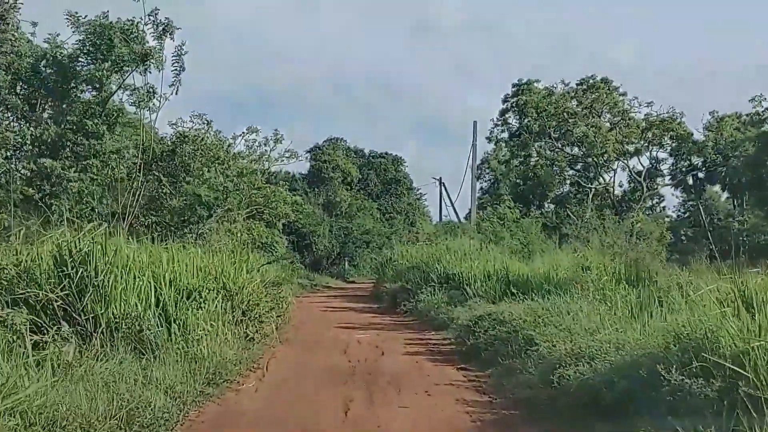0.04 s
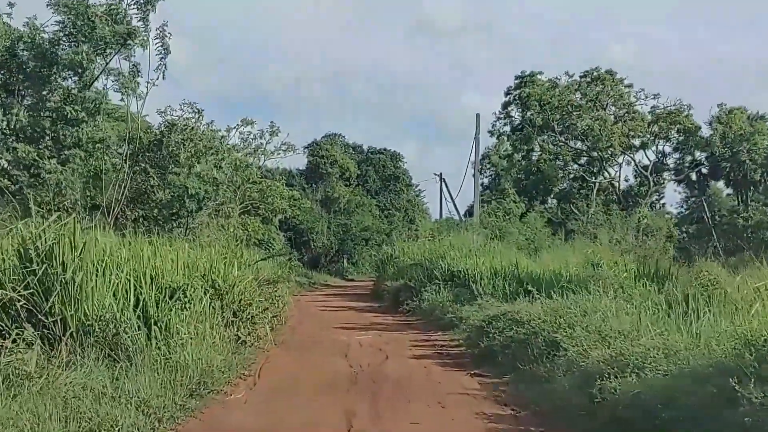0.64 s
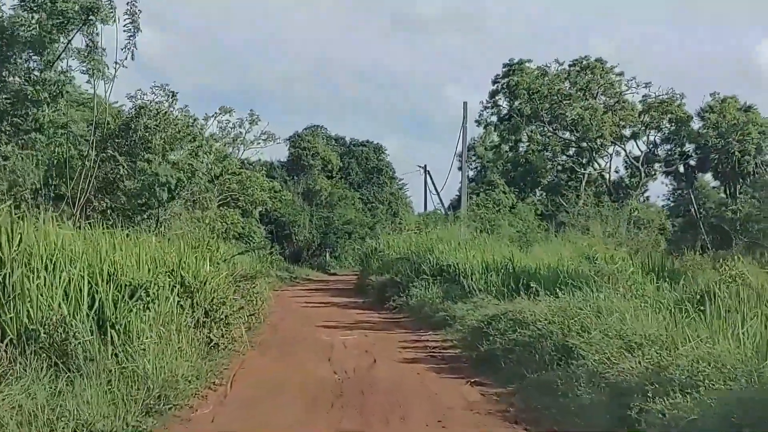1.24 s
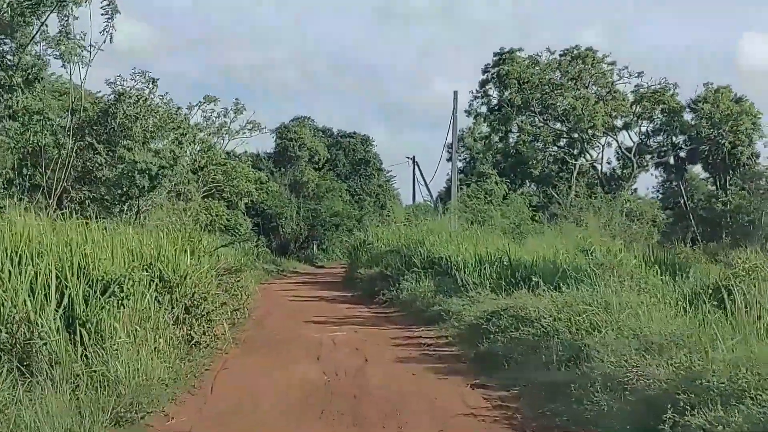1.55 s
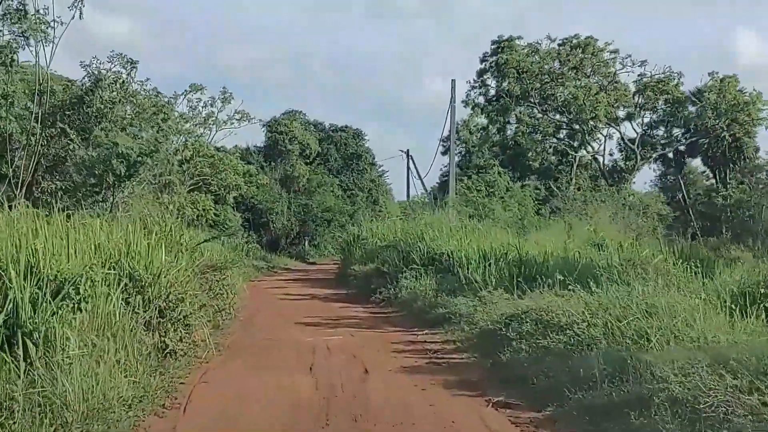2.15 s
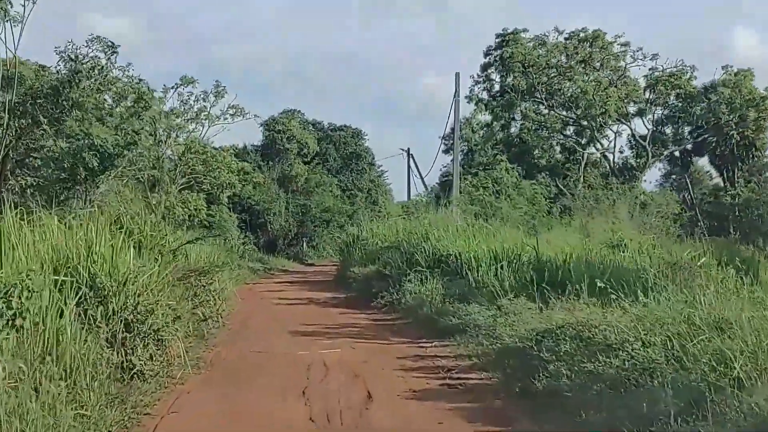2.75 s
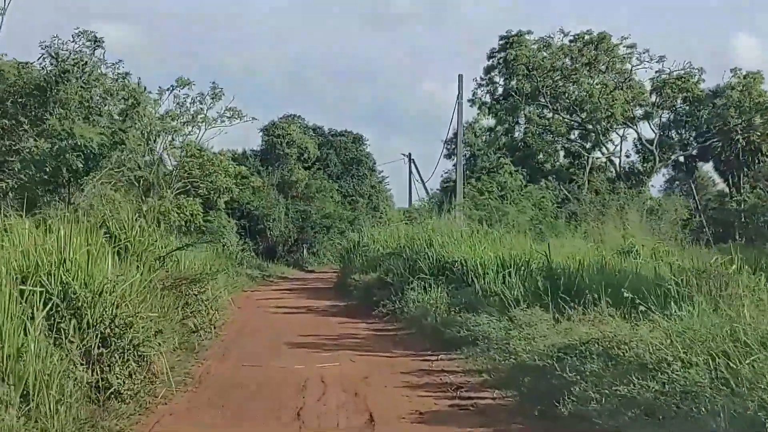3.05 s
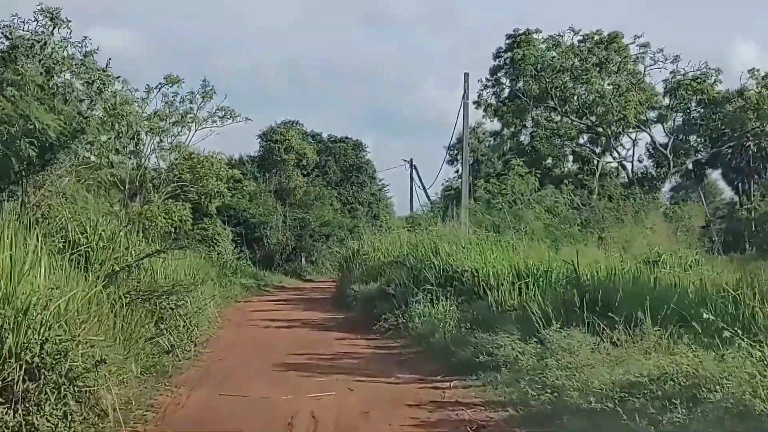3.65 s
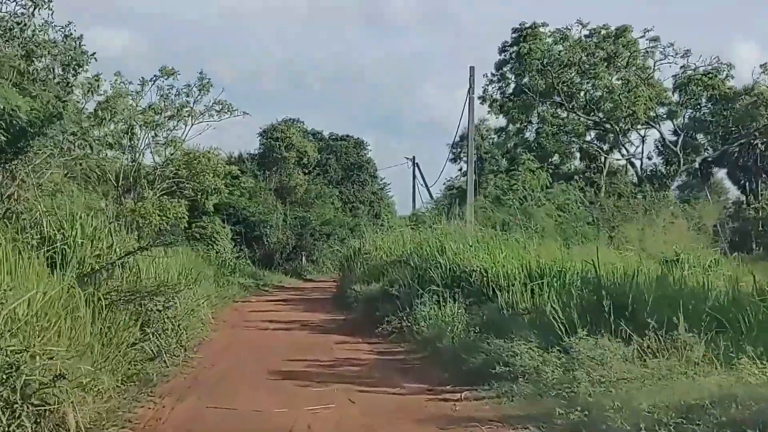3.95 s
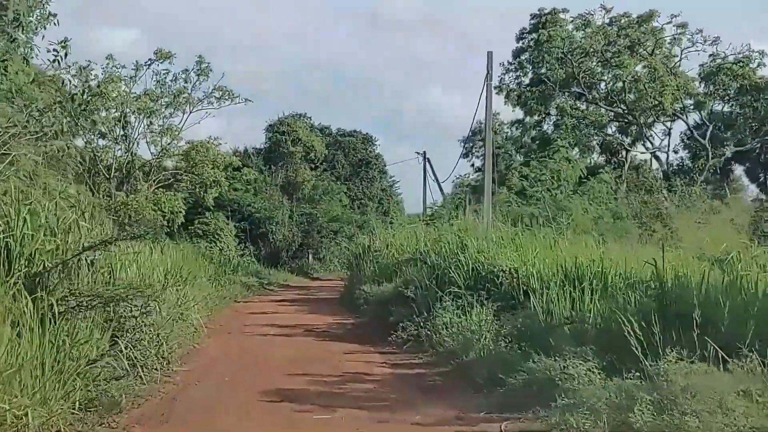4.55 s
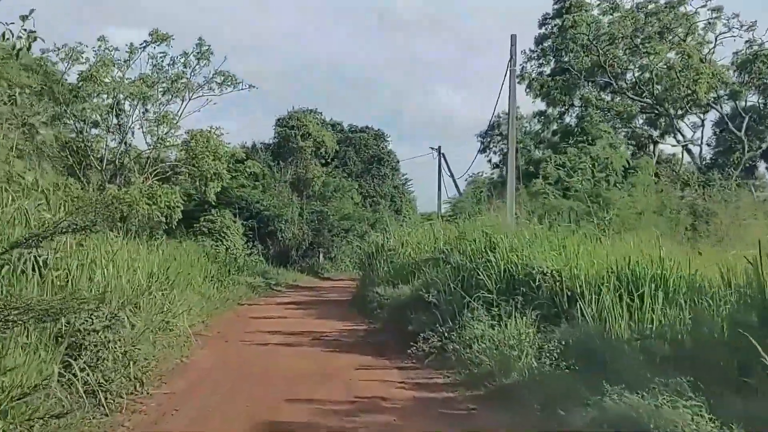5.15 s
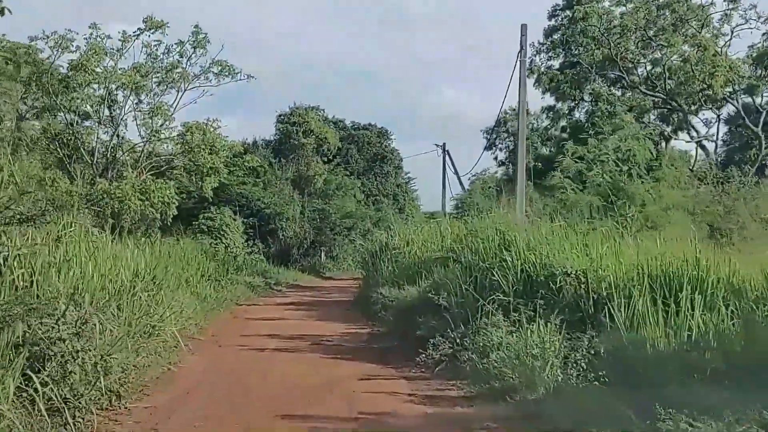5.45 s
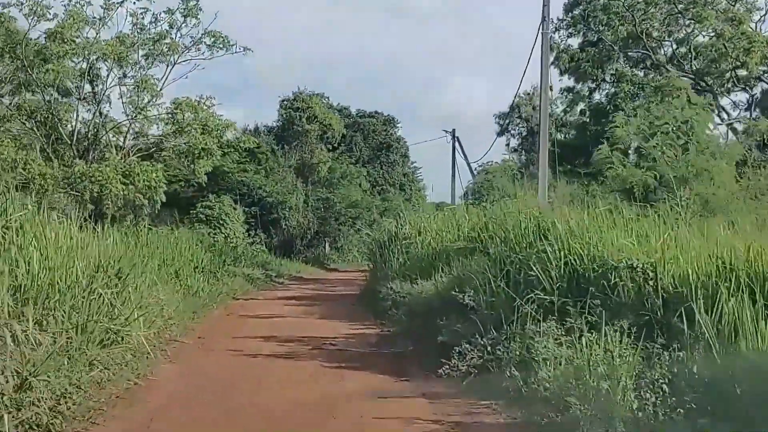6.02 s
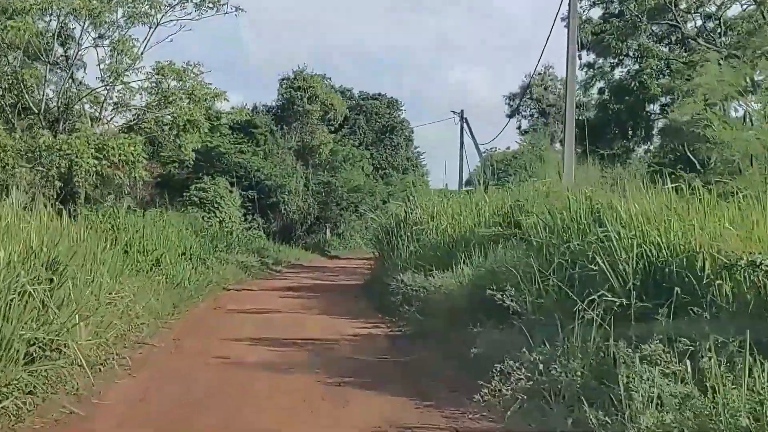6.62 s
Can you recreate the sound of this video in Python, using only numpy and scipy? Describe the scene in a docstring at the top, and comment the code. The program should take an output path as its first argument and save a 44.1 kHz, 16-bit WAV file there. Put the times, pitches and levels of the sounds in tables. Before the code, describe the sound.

A car's low rumble and engine hum, heard from inside, as bumps thud through the suspension and loose parts rattle.

```python
"""A deep, jolting rumble over an engine drone, inside a car creeping along a rutted dirt road.
The ruts pump the cabin air, shake the wheels and ring the body panels; the tyres crunch on grit.
Bumps knock the suspension and trim, loose parts click, squeak and sizzle, light things rustle.
One short low groan sounds near the end."""
import sys
import numpy as np
from scipy import signal
from scipy.fft import rfft, irfft
from scipy.io import wavfile
from scipy.ndimage import uniform_filter1d

SR = 44100
rng = np.random.default_rng(int(sys.argv[2]) if len(sys.argv) > 2 else 0)


def waveform_to_disk(signal):
    """Save audio, clipped to [-1, 1], as 16-bit WAV at the path in sys.argv[1]."""
    frames = np.transpose(np.atleast_2d(signal))
    scaled = np.clip(frames, -1, 1) * 32767
    samples = np.round(scaled).astype(np.int16)
    wavfile.write(sys.argv[1], SR, samples)


N = 303408
TIME = np.arange(N) / SR
FREQ = np.fft.rfftfreq(N, 1 / SR)


def undb(db):
    """Decibels to gain."""
    return 10 ** (np.asarray(db) / 20)


def curves(table):
    """Each value column of a table, interpolated over time."""
    times_s, *columns = np.transpose(table)
    return [np.interp(TIME, times_s, column) for column in columns]


def unit(x):
    """Scale to rms 1."""
    return x / np.sqrt(np.mean(x ** 2))


def walk(rate_hz):
    """Random drift, rms 1: held levels, smoothed twice."""
    k = max(int(SR / rate_hz), 1)
    held = np.repeat(rng.standard_normal(N // k + 1), k)
    return unit(uniform_filter1d(uniform_filter1d(held, k), k)[:N])


def resonate(x, hz, width_hz):
    """One resonance, gain 1 at its centre."""
    return signal.lfilter(*signal.iirpeak(min(hz, .45 * SR), hz / width_hz, fs=SR), x)


def levelled(x, span_s):
    """Even out a vibration's strength over spans longer than span_s."""
    k = max(int(span_s * SR), 1)
    power = uniform_filter1d(uniform_filter1d(np.mean(x, axis=0) ** 2, k), k)
    return x / np.sqrt(power + 1e-6)


def hit(start_s, hold_s, t60_s, rise_s):
    """Slice and envelope of an impact: rise, hold, exponential decay."""
    first = max(int(start_s * SR), 0)
    span = slice(first, min(first + SR // 3, N))
    age = TIME[span] - TIME[first]
    decay = np.exp(-np.log(1000) * np.maximum(age - hold_s, 0) / t60_s)
    return span, (1 - np.exp(-age / rise_s)) * decay


def bump(age, rise_s, fall_s):
    """Lopsided Gaussian, peak at age 0."""
    return np.exp(-(age / np.where(age < 0, rise_s, fall_s)) ** 2)


# Stereo width in the cabin: (frequency [Hz], side minus mid [dB])
CABIN_WIDTH = [(30, -49), (60, -38), (110, -18), (200, -12), (380, -6.5), (530, -9), (700, 2.5),
               (1000, -1.5), (2000, -0.5), (5000, 0.5), (8000, -1)]

def cabin_noise(spectrum, peaks=(), drive=1, ripple_db=3.0):
    """Noise from all sides, rms 1, shaped by (Hz, dB) points: near mono in the bass, wide in the treble."""
    def along(points):
        hz, db = np.transpose(points)
        return np.interp(np.log(FREQ + 1e-9), np.log(hz), db)
    db = along(spectrum)
    for centre_hz, width_hz, lift_db in peaks:
        db = db + lift_db / (1 + (2 * (FREQ - centre_hz) / width_hz) ** 2)
    # reflections ripple the spectrum above the bass
    ripple_hz = np.arange(0, SR, 55)
    ripple = np.interp(FREQ, ripple_hz, rng.standard_normal(len(ripple_hz)))
    db = db + ripple_db * ripple * np.minimum(FREQ / 1500, 1)
    in_band = (FREQ > spectrum[0][0]) & (FREQ < spectrum[-1][0])
    mid, side = rfft(rng.standard_normal((2, N)) * drive) * undb(db) * in_band
    side = side * undb(along(CABIN_WIDTH))
    return unit(irfft(np.array([mid + side, mid - side]), N))


# Engine speed: (time [s], firing rate [Hz])
FIRING_RATE = [(0, 31.5), (1.8, 32), (2.7, 33), (3.6, 35), (4.7, 34), (5.8, 35), (6.88, 36)]
# Drone partials: (multiple of the firing rate, level [dB])
ENGINE_ORDERS = [(1, -27), (2, -25), (4, -34.5)]

def engine():
    """A slow engine drones and throbs with its load; a faint steady hum runs beside it."""
    throb_db, hum_hz, hum_db = 2.5, 164.4, -34.5
    firings = np.cumsum(curves(FIRING_RATE)[0] * (1 + 0.0059 * walk(6))) / SR
    drone = np.zeros(N)
    for order, db in ENGINE_ORDERS:
        gain = undb(db + throb_db * walk(7))
        drone += gain * np.sin(2 * np.pi * (order * firings + rng.random()))
    hum = undb(hum_db + 1.8 * walk(4.02)) * np.sin(2 * np.pi * hum_hz * TIME)
    return np.sqrt(2) * (drone + hum)


# Crunch, sizzle and dust hiss spectra: (frequency [Hz], relative density [dB])
CRUNCH_SPECTRUM = [(350, -3), (650, -3.5), (820, 2), (1000, 0.5), (1200, -5), (1500, -6.5), (1900, -9),
                   (2500, -16), (3200, -19), (4300, -23.5), (6000, -29.5), (9000, -40)]
SIZZLE_SPECTRUM = [(3500, -15), (6200, -12.5), (6700, 1.5), (7400, 1), (8050, -3), (8400, -14),
                   (11000, -33)]
DUST_SPECTRUM = [(2500, -4), (4500, -5), (8000, 0), (9000, -10.5), (10300, -3.5), (12500, -6.5),
                 (13400, -3.5), (15800, -5)]
# Tyre crunch: (time [s], base level [dB])
CRUNCH_COURSE = [(0, -36.5), (.35, -35.5), (.7, -38.5), (1.35, -38.5), (1.7, -38), (3.4, -37.5),
                 (4.5, -37.5), (5.6, -37.5), (6.88, -36)]
# Loose grit under the car: (time [s], relative treble level [dB])
GRIT_COURSE = [(0.0, -54), (0.57, -49.5), (0.82, -55.5), (1.44, -60.5), (1.63, -56.5), (2.14, -61.5),
               (2.47, -55), (2.74, -62), (3.05, -61), (4.06, -56.5), (4.31, -53), (4.54, -53.5),
               (5.14, -58.5), (5.65, -55.5), (6.07, -49.5), (6.88, -51.5)]
# Sizzle swells: (start [s], length [s], level [dB])
SIZZLE_SWELLS = [(0.368, 0.3, -43), (1.64, 0.26, -52.5), (3.02, 0.37, -49), (5.82, 0.59, -49)]

def tyres_on_grit(panel_gain):
    """Tyres crush countless grains, louder as the panels shake; a narrow sizzle and dust hiss lie above."""
    grit_db, shake_db = curves(GRIT_COURSE)[0], 20 * np.log10(panel_gain)
    grit_db, shake_db = grit_db - grit_db.mean(), shake_db - shake_db.mean()
    crunch = cabin_noise(CRUNCH_SPECTRUM, drive=undb(1.2 * walk(600)), ripple_db=2.3)
    crunch *= undb(curves(CRUNCH_COURSE)[0] + 0.19 * shake_db + 0.77 * walk(24.99))
    sizzle_db, dust_db = -62 + 0.8 * grit_db, -52.5 + 0.64 * grit_db
    sizzle_power = undb(sizzle_db) ** 2
    for start_s, length_s, db in SIZZLE_SWELLS:
        swell = np.sin(np.pi * np.clip((TIME - start_s) / length_s, 0, 1))
        sizzle_power += (undb(db) * swell) ** 2
    sizzle = cabin_noise(SIZZLE_SPECTRUM, ripple_db=4.0) * np.sqrt(sizzle_power) * undb(2.6 * walk(90))
    dust = cabin_noise(DUST_SPECTRUM, ripple_db=3.5) * undb(dust_db + walk(90) + 0.9 * walk(12))
    return crunch + sizzle + dust


# Scrapes and rustles: (start [s], length [s], centre [Hz], width / centre, relative level [dB])
RUSTLE_SWELLS = [(0.102, 0.14, 1650, 0.4, -39.5), (.14, .12, 10000, 1, -50.5),
                 (0.25, 0.085, 1650, 0.37, -38), (0.252, 0.075, 3670, 0.44, -49),
                 (.36, .26, 13000, .7, -54), (1.387, .04, 13500, 1, -43), (1.43, 0.35, 1200, .45, -42),
                 (2.285, 0.16, 13000, 0.45, -50), (2.498, .07, 13000, .5, -49),
                 (2.67, 0.085, 12000, 1, -53), (4.112, 0.12, 13000, 0.82, -38.5),
                 (4.125, 0.17, 7400, 0.62, -48), (4.35, 0.057, 12000, 1, -46),
                 (4.49, 0.064, 1800, 0.68, -46), (5.31, 0.089, 1800, .9, -46),
                 (5.99, 0.046, 13500, .6, -50), (6.22, 0.11, 14000, 0.4, -51)]

def rustles():
    """Grit scrapes and light things brush past each other in swells of uneven hiss."""
    out = np.zeros((2, N))
    friction = rng.standard_normal((2, N)) * undb(2.8 * walk(130))
    for start_s, length_s, hz, width_ratio, db in RUSTLE_SWELLS:
        span = slice(int(start_s * SR), int((start_s + length_s) * SR))
        width_hz = min(hz * width_ratio, .4 * SR)
        hiss = resonate(resonate(friction[:, span], hz, width_hz), hz, width_hz)
        swell = np.sin(np.linspace(0, np.pi, hiss.shape[1]))
        out[:, span] += undb(db + 2.0) * swell * unit(hiss)
    return out


# Pings and squeaks: (start [s], pitch [Hz], level [dB], t60 [s])
SQUEAK_NOTES = [(1.617, 6530, -29.5, 0.025), (1.665, 2950, -35, 0.031), (3.201, 3040, -27.5, 0.045),
                (3.202, 4300, -44, .03), (3.221, 3110, -40, 0.079)]

def squeaks():
    """A small part slips or is flicked and rings on one slightly rough note."""
    out = np.zeros((2, N))
    waver = 1 + .012 * np.array([walk(900), walk(900)])
    for start_s, hz, db, t60_s in SQUEAK_NOTES:
        span, envelope = hit(start_s, hold_s=0.0038, t60_s=t60_s, rise_s=0.0013)
        phase = 2 * np.pi * np.cumsum(hz * waver[:, span], axis=1) / SR
        out[:, span] += undb(db) * envelope * np.sin(phase)
    return out


def groan():
    """A short hollow tone swells, sinks in pitch and fades."""
    start_s, length_s, level_db = 5.89, 0.124, -15.5
    start_hz, sag_hz_per_s = 190, 236
    age = np.clip(TIME - start_s, 0, length_s)
    phase = 2 * np.pi * np.cumsum(start_hz - sag_hz_per_s * age) / SR
    swell = np.sqrt(2 * np.abs(np.sin(np.pi * age / length_s)))
    return undb(level_db) * swell * (np.sin(phase) + undb(-18.5) * np.sin(2 * phase))


# Bright tick and dull clack spectra: (frequency [Hz], relative density [dB])
TICK_SPECTRUM = [(3000, -22), (5500, -7), (6500, -4), (7400, -0.5), (8500, -8), (10500, -7.5), (12000, -8),
                 (13500, -1), (16000, -7.5)]
CLACK_SPECTRUM = [(800, 9), (1800, 3.5), (3200, 6), (5000, 0), (6500, 2), (10000, -16)]
# Modes of loose metal bits: (frequency [Hz], relative level [dB], t60 [s])
METAL_MODES = [(5030, -7, .08), (5900, -14, .08), (6730, -5.5, 0.081), (7030, -4.5, .09), (7160, -5, 0.076),
               (7380, -2, .08), (7800, -5, .08), (8023, -5, .09), (8800, -11, .07), (11600, -4.5, .08),
               (12470, -11, .16), (13355, 0, .09), (13960, -8, .09), (14420, -7, .13)]
# Contacts: (start [s], tick gain [dB], clack gain [dB], rise [s], favoured ring [Hz], ring L - R [dB])
CLICK_HITS = [(0.053, -52, -38, 0.0025, 5100, 0), (0.328, -31, -33.5, .002, 6700, 2),
              (0.41, -32, -38, 0.00036, 7100, -4), (0.501, -29.5, -35, .0004, 6900, -4),
              (0.743, -22.5, -40, 0.00089, 11650, -1), (1.13, -39, -39.5, .003, 8020, 0),
              (1.161, -33, -36.5, .004, 6900, 2), (1.2, -34, -34, .003, 5800, 0),
              (1.369, -36, -46, .002, 14400, 0), (1.414, -31, -44, .002, 13350, -3),
              (1.419, -28, -56, .0005, 13350, -3), (1.618, -39, -56, .001, 6900, -2),
              (1.661, -54, -34.5, .002, 6700, -3), (2.103, -29, -33.5, .001, 6940, 0),
              (2.229, -40, -52, .003, 6900, 0), (2.292, -36.5, -46, .001, 14400, -4),
              (2.353, -30.5, -37, .0005, 14400, 3), (2.445, -51, -41, .003, 7070, -4),
              (2.52, -35, -42, .003, 6700, 0), (2.594, -35, -40, .004, 6800, 0),
              (2.744, -40, -52, .001, 6700, 0), (2.924, -41, -42, .002, 7100, 2),
              (2.9606, -17, -36, .0003, 7350, -8), (3.016, -43.5, -62, .0005, 8020, -2),
              (3.252, -43, -47, .002, 7400, 1), (3.508, -21, -32.5, 0.00075, 5065, -1),
              (3.572, -31, -37, .005, 5800, -11), (3.853, -48, -41.5, .003, 5800, -1),
              (3.965, -43, -36.5, .004, 5060, 2), (4.369, -32, -55, .001, 6660, 0),
              (4.381, -24.5, -50, .0015, 13900, 0), (4.768, -34, -46, .003, 7040, 0),
              (4.814, -39, -43, .002, 7400, 0), (4.9225, -34.5, -44, .0005, 11650, 1),
              (5.7918, -18.5, -39, .0008, 8020, -7), (5.801, -22, -48, .0008, 7095, -13),
              (5.9875, -29.5, -48, .001, 6750, -4), (6.077, -26, -36.5, .005, 7700, -2),
              (6.364, -35, -40, 0.0046, 6740, 7), (6.41, -37, -42, .004, 5070, -2),
              (6.486, -35, -42, 0.0036, 14400, -3), (6.528, -35, -47, 0.0035, 5800, 1),
              (6.627, -32, -33.5, .004, 5100, -1), (6.653, -38, -35.5, .004, 6860, 0)]

def clicks():
    """Loose parts snap and chatter: a bright tick with a thin metal ring, and a duller clack."""
    chatter_db, crack_db, ring_db = -9, -1, -15.5
    favour_db, favour_width_hz, scatter_db = 9.5, 330, 2
    hard_rise_s, crack_decay_s, snap_decay_s = .0007, .0014, .0024
    out = np.zeros((2, N))
    tick_noise = cabin_noise(TICK_SPECTRUM) * undb(1.9 * walk(700))
    clack_noise = cabin_noise(CLACK_SPECTRUM) * undb(walk(500))
    crack_noise = cabin_noise([(4000, -14), (7000, -3), (10000, -4), (13000, 0), (16000, 2)])
    mode_hz, mode_db, mode_t60_s = np.transpose(METAL_MODES)
    poles = 2j * np.pi * mode_hz - np.log(1000) / mode_t60_s
    for start_s, tick_db, clack_db, rise_s, favoured_hz, pan_db in CLICK_HITS:
        # stronger clicks chatter longer
        span, envelope = hit(start_s, hold_s=.02 * undb(tick_db) ** .5, t60_s=0.07, rise_s=rise_s)
        age = TIME[:len(envelope)]
        chatter = undb(chatter_db) * tick_noise[:, span] * envelope
        # fast contacts add a glassy crack
        hardness = 1 / (1 + (rise_s / hard_rise_s) ** 2)
        crack = undb(crack_db) * hardness * crack_noise[:, span] * np.exp(-age / crack_decay_s)
        # each contact point excites its own mix of modes
        lift_db = favour_db / (1 + ((mode_hz - favoured_hz) / favour_width_hz) ** 2)
        mix_db = mode_db + lift_db + scatter_db * rng.standard_normal(len(mode_hz))
        weights = undb(mix_db) * np.exp(2j * np.pi * rng.random((2, len(mode_hz))))
        ring = (weights @ np.exp(poles[:, None] * age)).real * (1 - np.exp(-age / rise_s))
        ring *= undb(ring_db + np.array([[pan_db], [-pan_db]]) / 2)
        snap = 1 + undb(1.5) * np.exp(-age / snap_decay_s)
        tick = (chatter + crack + ring) * snap * undb(tick_db)
        # heavier parts build up more slowly
        _, clack_envelope = hit(start_s, hold_s=0.0047, t60_s=0.098, rise_s=0.0024)
        clack = clack_noise[:, span] * clack_envelope * undb(clack_db + 2.0)
        out[:, span] += tick + clack
    return out


# Suspension thud spectrum: (frequency [Hz], relative density [dB])
THUD_SPECTRUM = [(120, 11.5), (300, 4), (520, 2.5), (750, -4), (1300, -30), (2000, -18.5), (3500, -46),
                 (8000, -48)]
# Suspension and trim knocks: (start [s], thud gain [dB], panel note [Hz], clap gain [dB], hold [s])
KNOCK_HITS = [(0.092, -22, 331, -38, 0.015), (0.125, -13.5, 345, -51, 0.022), (0.173, -19, 322, -35, 0.015),
              (0.264, -17.5, 258, -37.5, 0.038), (1.037, -17.5, 384, -51, 0.019),
              (1.154, -13, 340, -30, 0.017), (1.196, -18, 307, -32, 0.015), (2.1, -7.5, 290, -23.5, 0.013),
              (2.8, -21, 283, -44, 0.015), (2.929, -29, 361, -48, 0.018), (3.299, -12.5, 262, -39, 0.0097),
              (3.974, -13, 324, -39, 0.016), (4.119, -15.5, 520, -34, 0.03),
              (4.214, -11, 516, -32.5, 0.0086), (4.834, -28, 250, -53, 0.015),
              (6.08, -16, 250, -29.5, 0.023), (6.104, -20, 710, -40, 0.037),
              (6.199, -15.5, 307, -51, 0.015), (6.533, -19, 390, -27.5, 0.0078),
              (6.621, -16.5, 615, -26.5, 0.014), (6.78, -14, 254, -45, 0.015),
              (6.807, -15.5, 370, -50, 0.02)]

def knocks():
    """Bumps bottom out the suspension, ring one panel and clap the trim against the body."""
    out = np.zeros((2, N))
    thud_noise = cabin_noise(THUD_SPECTRUM)
    clap_noise = cabin_noise([(500, -3.0), (1100, 10.5), (1900, 0.5), (3000, -9.0), (6000, -15)])
    for start_s, thud_db, panel_hz, clap_db, hold_s in KNOCK_HITS:
        span, envelope = hit(start_s, hold_s, t60_s=0.082, rise_s=0.0014)
        ring = undb(13.5) * resonate(thud_noise[:, span], panel_hz, width_hz=80)
        thud = levelled(thud_noise[:, span] + ring, span_s=0.0083) * undb(thud_db - 8.5)
        clap = clap_noise[:, span] * undb(clap_db - 0.5)
        out[:, span] += envelope * (thud + clap)
    return out


# Panel booms: (peak time [s], pitch [Hz], level [dB])
PANEL_THUMPS = [(0.185, 175, -18), (1.365, 84, -12.5), (2.375, 121, -18.5), (3.35, 140, -22),
                (3.675, 165, -21), (4.73, 133.6, -18), (6.035, 156, -23), (6.215, 178, -24)]

def panel_thumps():
    """A bump swings a large panel on one low note, damped within a few cycles."""
    out = np.zeros(N)
    for peak_s, hz, db in PANEL_THUMPS:
        age = TIME - peak_s
        swing = undb(db) * bump(age, rise_s=0.023, fall_s=.032)
        out += swing * np.sqrt(2) * np.sin(2 * np.pi * (hz * age + rng.random()))
    return out


# Steady shake: (time [s], cabin boom [dB], wheel rumble [dB], panel ring [dB])
SHAKE_COURSE = [(0.0, -29, -18.5, -21.5), (0.45, -20.5, -20, -25.5), (1.05, -17, -19.5, -24.5),
                (1.4, -20.5, -18.5, -23.5), (1.8, -23, -18, -24), (2.25, -17, -17.5, -23.5),
                (2.65, -17, -18, -24.5), (3.3, -18, -17, -24.5), (4.3, -19.5, -16.5, -25.5),
                (4.75, -16.5, -16, -23), (5.15, -18.5, -17.5, -25), (5.7, -17.5, -17.5, -23.5),
                (6.25, -18.5, -17, -24), (6.88, -17, -18.5, -24)]
# Ruts: (peak time [s], wheel thump [dB], panel ring [dB])
RUT_JOLTS = [(0.035, -16.5, -32), (0.185, -11, -19), (0.93, -14, -33), (1.06, -20, -21.5), (1.36, -18, -37),
             (1.81, -13, -38), (2.03, -16, -37), (2.38, -18, -25), (2.845, -20, -23.5), (2.95, -14, -23),
             (3.15, -17, -26.5), (3.35, -18, -23.5), (3.44, -13.5, -39), (3.68, -20, -23.5),
             (3.88, -12, -24), (4.03, -15, -24.5), (4.73, -13, -25), (4.85, -15.5, -31), (5.42, -15, -38),
             (5.57, -13.5, -42), (6.08, -10, -27), (6.53, -15.5, -27), (6.69, -15.5, -33)]
# Dips that heave the cabin: (peak time [s], length [s], boom [dB])
ROAD_DIPS = [(0.462, 0.15, -14.5), (1.717, 0.37, -13), (3.493, 0.1, -17), (4.278, 0.37, -17),
             (5.5, 0.15, -12)]

def road_shake():
    """Gains of boom, wheels and panels: the steady shake, ruts and dips add in power."""
    boom_power, wheel_power, panel_power = undb(curves(SHAKE_COURSE)) ** 2
    for peak_s, wheel_db, panel_db in RUT_JOLTS:
        jolt = bump(TIME - peak_s, rise_s=0.02, fall_s=0.03)
        wheel_power += jolt * undb(wheel_db) ** 2
        panel_power += jolt * undb(panel_db) ** 2
    for peak_s, length_s, db in ROAD_DIPS:
        heave = np.cos(np.pi * np.clip((TIME - peak_s) / length_s, -.5, .5))
        boom_power += (undb(db) * heave) ** 2
    return np.sqrt([boom_power, wheel_power, panel_power])


# Cabin air, wheel and body panel spectra: (frequency [Hz], relative density [dB])
BOOM_SPECTRUM = [(14, -18), (22, -10), (29, -4), (32, -2.5), (34.7, 12), (38, -3), (44, -9), (70, -50)]
WHEEL_SPECTRUM = [(32, -29), (44, -3.5), (55, 5.5), (68, 3), (76, -1), (86, 1), (100, -4), (118, -15),
                  (170, -29)]
PANEL_SPECTRUM = [(75, -24), (115, -2), (175, -3), (205, -5), (260, -8.5), (350, -12), (440, -14.5),
                  (560, -13), (700, -22.5), (1000, -44), (2000, -63)]
# Panel resonances: (centre [Hz], width [Hz], lift [dB])
PANEL_MODES = [(139.3, 36, 4.5), (172.2, 9.7, 7), (288.3, 12, 7.5), (334.3, 12.3, 7), (511, 52, 3.5)]

def road_rumble(boom_gain, wheel_gain, panel_gain):
    """Ruts pump the cabin air, shake the wheels and ring the panels."""
    boom = levelled(cabin_noise(BOOM_SPECTRUM), span_s=0.15) * boom_gain
    wheels = levelled(cabin_noise(WHEEL_SPECTRUM), span_s=0.11) * wheel_gain
    panels = levelled(cabin_noise(PANEL_SPECTRUM, PANEL_MODES), span_s=0.11) * panel_gain
    return boom * undb(0.3) + wheels * undb(0.1) + panels * undb(0.23)


def scene():
    """Stereo mix at the front seat."""
    boom_gain, wheel_gain, panel_gain = road_shake()
    low_end = engine() + road_rumble(boom_gain, wheel_gain, panel_gain) + panel_thumps()
    return low_end + tyres_on_grit(panel_gain) + clicks() + knocks() + squeaks() + rustles() + groan()


def record(dry):
    """Edge fades, low cut, soft peak limit, high cut."""
    fade_s, low_cut_hz, ceiling, high_cut_hz = .01, 19, .8, 15750
    faded = dry * np.minimum(np.minimum(TIME, TIME[::-1]) / fade_s, 1)
    high_passed = irfft(rfft(faded) * FREQ ** 8 / (FREQ ** 8 + low_cut_hz ** 8), N)
    limited = high_passed / (1 + (high_passed / ceiling) ** 6) ** (1 / 6)
    return signal.sosfilt(signal.ellip(10, .2, 80, high_cut_hz, fs=SR, output="sos"), limited)


dry = scene()
out = record(dry)
waveform_to_disk(out)
```